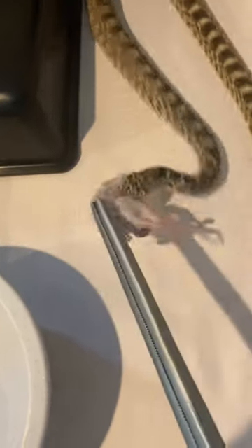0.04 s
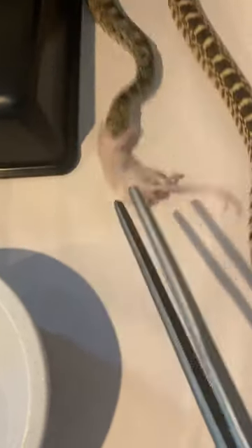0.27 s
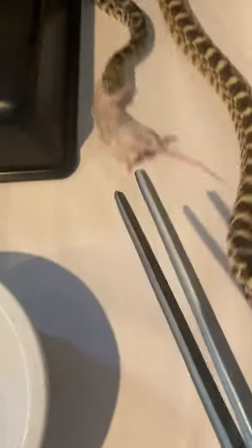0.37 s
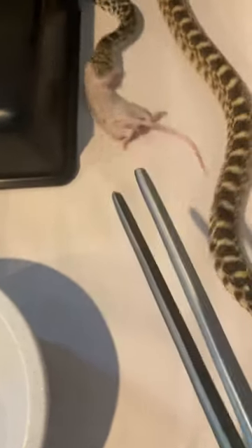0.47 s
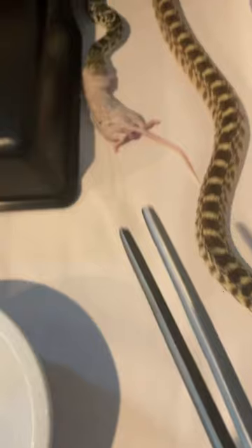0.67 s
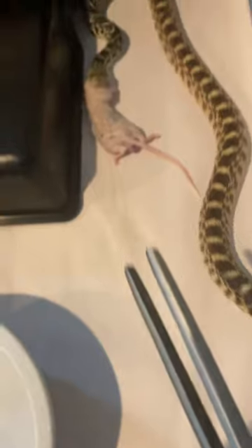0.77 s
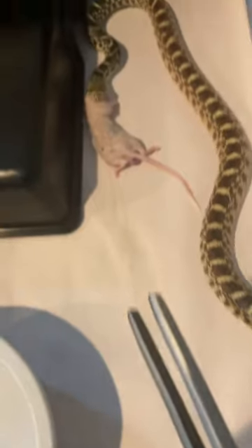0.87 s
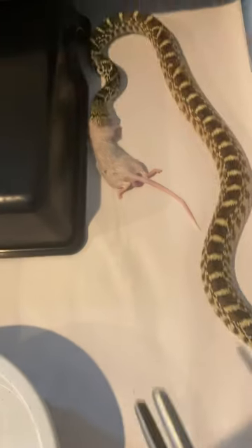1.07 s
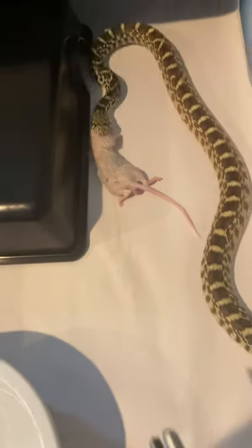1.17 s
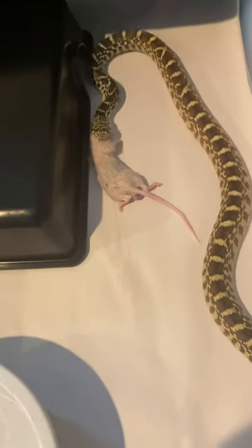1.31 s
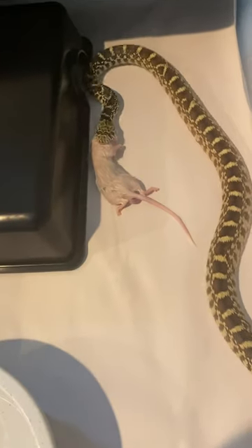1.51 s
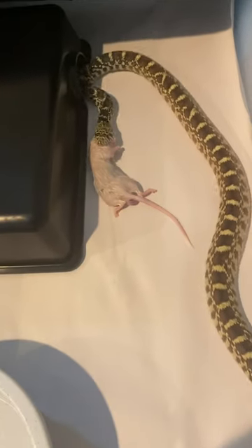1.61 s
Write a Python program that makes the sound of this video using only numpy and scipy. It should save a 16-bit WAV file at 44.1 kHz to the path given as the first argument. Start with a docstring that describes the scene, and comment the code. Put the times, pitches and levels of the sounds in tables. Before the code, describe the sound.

A snake's strike makes one hollow thump in a paper-lined plastic tub, close by. First its body slides softly. At about 0.2 seconds the paper scuffs, jaws and steel tongs snap, and snake and prey land with the thump. Scales drag back with a soft, fading hiss, then scratch lightly on the paper from 0.9 to about 1.4 seconds. A low room hum lies underneath.

```python
"""A snake snatches a mouse from steel tongs in a paper-lined plastic tub, close to the microphone.
First its body slides softly over the paper, above a low room hum. At about 0.2 s it strikes:
the paper is scuffed, jaws and tongs snap, and snake and prey land, ringing the tub with a hollow thump.
Then it pulls back with a hiss of sliding scales, and from 0.9 s single scales scratch on the paper."""
import sys
import numpy as np
from scipy import signal
from scipy.fft import rfft, irfft
from scipy.io import wavfile

SR = 44100
rng = np.random.default_rng(int(sys.argv[2]) if len(sys.argv) > 2 else 0)


def master_out(mix):
    """Clip the mix to full scale and print it as 16-bit PCM to the path in sys.argv[1]."""
    frames = np.transpose(np.atleast_2d(mix))
    ceiling = np.clip(frames, -1, 1)
    pcm = np.round(ceiling * 32767).astype(np.int16)
    wavfile.write(sys.argv[1], SR, pcm)


N = 72765
T = np.arange(N) / SR
HZ = np.fft.rfftfreq(N, 1 / SR)


def thump():
    """The landing body slaps the paper and rings the tub floor, which gives off little deep bass."""
    # blows on the floor: t/s, level/dB, contact time/s
    blows = [(0.2147, -26.5, 0.00065), (0.2199, -16.5, 0.00453), (0.2293, -20, 0.00188),
             (0.2331, -28.5, 0.0018)]
    # tones of the floor: f/Hz, level/dB, time to fade by 60 dB/s
    floor_tones = [(85.8, -3.5, 0.11), (183, 7, 0.0498), (287.5, -2.5, 0.054), (425, -7, .07),
                   (489.4, -13, 0.077), (686, -24.5, 0.057), (881, -15, 0.047), (1089, -5, 0.033),
                   (1330, -12, 0.035), (2300, -21, .022)]
    # paper shoved and slapped: middle t/s, length/s, level/dB
    slaps = [(0.195, 0.013, -52.5), (0.2141, 0.0096, -36.5)]
    # tone colour of the paper: f/Hz, level/dB
    slap_colour = [(60, -12), (420, 7.5), (700, 0.5), (1200, -14), (2000, -6), (5000, -15), (9000, -23),
                   (16000, -17)]
    force = np.zeros(N)
    for start, db, contact in blows:
        push = np.sin(np.pi * np.clip((T - start) / contact, 0, 1)) ** 2
        force -= amp(db) * push / push.sum()
    floor = signal.fftconvolve(force, ring(floor_tones, T))[:N]
    low_cut = signal.butter(2, 75, "high", fs=SR, output="sos")
    paper = sum(swell(*slap) for slap in slaps) * friction(slap_colour)
    return signal.sosfilt(low_cut, floor) + paper


def bite():
    """Jaws and tongs snap and ring briefly as the prey is torn away."""
    # snaps: t/s, level/dB
    snaps = [(0.2061, -30), (0.2585, -36.5)]
    # tones of a snap: f/Hz, level/dB, time to fade by 60 dB/s
    snap_tones = [(3450, -2, 0.0094), (4540, 1.5, 0.0063), (5140, 3, 0.0086), (6700, -26, 0.0067),
                  (8240, -1, 0.0085), (12000, -33, .002)]
    return sum(amp(db) * ring(snap_tones, T - start) for start, db in snaps)


def sliding_scales():
    """The body drags over the paper in pulls, with uneven grip, and scuffs it in the strike."""
    # steady drag: t/s, level/dB
    drag_levels = [(0, -60.5), (0.13, -63), (0.2, -56.5), (0.3, -52), (0.35, -55), (0.42, -57.5),
                   (0.48, -66), (0.53, -63), (0.66, -70), (0.82, -65), (0.9, -75.5), (0.96, -78.5),
                   (1.08, -66), (1.2, -68.5), (1.26, -87), (1.65, -81)]
    # pulls that swell the drag: middle t/s, length/s, level/dB
    pulls = [(0.018, .008, -55.5), (0.058, 0.032, -67.5), (0.438, 0.03, -54), (0.576, 0.024, -56),
             (0.631, 0.025, -58), (0.691, 0.021, -59), (0.765, 0.034, -60.5), (0.834, 0.023, -61.5),
             (1.001, 0.013, -55.5)]
    # fast scuffs: middle t/s, length/s, level/dB
    scuffs = [(0.1757, 0.0032, -34.5), (0.181, 0.025, -42.5), (0.2037, 0.003, -31), (0.253, 0.021, -45),
              (0.289, 0.013, -51.5)]
    # tone colours of drag and scuff: f/Hz, level/dB
    drag_colour = [(200, 4), (1200, -10.5), (2200, -8), (3300, -5.5), (4300, -1), (5100, 3), (6000, 2),
                   (7200, -2.5), (9000, -3.5), (12000, -6.5), (16000, -8.5)]
    scuff_colour = [(200, -24), (1200, -26.5), (2200, -12.5), (3300, -8.5), (4300, -2.5), (5100, 2),
                    (6000, -4), (7200, -1.5), (9000, -15.5), (12000, -21), (16000, -19)]
    steady = amp(np.interp(T, *np.transpose(drag_levels)))
    grip = amp(1.5 * waver(hz=87))
    drag = np.sqrt(steady ** 2 + sum(swell(*pull) ** 2 for pull in pulls)) * grip
    scuffing = np.sqrt(sum(swell(*scuff) ** 2 for scuff in scuffs))
    return drag * friction(drag_colour) + scuffing * friction(scuff_colour)


def scratches():
    """Belly scales catch on the paper one after another, each with its own tone colour."""
    # catches: t/s, relative level/dB
    catches = [(0.9316, -44), (0.9764, -45.5), (1.0132, -45), (1.0386, -41.5), (1.0506, -43.5),
               (1.062, -53), (1.072, -41.5), (1.0844, -46.5), (1.0965, -49), (1.111, -49.5), (1.1099, -50),
               (1.1325, -47), (1.1523, -43), (1.1737, -45), (1.1964, -49), (1.217, -44), (1.2715, -51.5),
               (1.3488, -50.5)]
    # tone colour they share: f/Hz, level/dB
    colour = [(200, -42), (1500, -27), (2100, -4), (2600, -24), (3150, -2.5), (4300, -11), (5300, 3.5),
              (6200, -1), (7200, 4.5), (9000, -4), (12000, -10), (16000, -8)]
    # bands that each catch makes louder or softer at random: f/Hz
    centres = [2000, 3100, 4200, 5300, 6400, 8000, 12000]
    rise_s, fade_s, trim_db, vary_db = 0.0029, 0.043, -5, 3.5
    bursts = np.array([amp(db + trim_db) * np.clip((T - start) / rise_s, 0, 1) * fade(T - start, fade_s)
                       for start, db in catches])
    weights = amp(vary_db * rng.standard_normal((len(catches), len(centres))))
    weights /= np.sqrt(np.mean(weights ** 2, axis=1, keepdims=True))
    rub = rfft(friction(colour))
    bands = np.array([irfft(rub * np.interp(HZ, centres, band), N) for band in np.eye(len(centres))])
    return (weights.T @ bursts * bands).sum(axis=0)


def friction(colour):
    """Rubbing is many tiny slips of uneven size over a smooth hiss."""
    slips_per_s, spread_db, slip_share = 4600, 3.5, 0.56
    size = amp(spread_db * np.minimum(rng.exponential(1, N), 4))
    slips = size * rng.choice([-1, 1], N) * (rng.random(N) < slips_per_s / SR)
    hiss = rng.standard_normal(N)
    return coloured(np.sqrt(slip_share) * unit(slips) + np.sqrt(1 - slip_share) * hiss, colour)


def room(x):
    """The room adds a soft wash of echoes whose treble dies first."""
    # echo length: f/Hz, time to fade by 60 dB/s
    fade_times = [(80, 0.43), (300, 0.7), (1000, 0.35), (5000, 0.37), (14000, .18)]
    hz, t, noise = signal.stft(rng.standard_normal(SR // 2), SR, nperseg=256)
    tail = signal.istft(noise * fade(t, look_up(fade_times, hz)[:, None]), SR, nperseg=256)[1]
    tail *= np.minimum(np.arange(len(tail)) / SR / 0.0029, 1)  # quick fade-in
    return signal.fftconvolve(x, tail / np.linalg.norm(tail))[:N]


def channels(x):
    """The left and right channels are out of step by a phase that grows with pitch, each with its own share of
    shifting wall echoes."""
    # how far left is ahead of right: f/Hz, phase/rad
    left_lead = [(20, 0), (1500, -.05), (2600, .6), (3600, .1), (4300, .5), (5000, .1), (5600, .8),
                 (6400, 2.2), (7050, 3.08), (7900, 3.2), (8700, 4.4), (9400, 5.2), (9900, 6.25),
                 (11100, 6.3), (11700, 7.), (12400, 8.6), (13100, 9.35), (14000, 9.5), (14800, 10.4),
                 (15400, 11.8), (16000, 12.3)]
    # echoes added on the left and subtracted on the right: f/Hz, level/dB
    echo_colour = [(30, -35), (150, -27), (350, -8.5), (700, 7), (1500, -4), (2700, 2.5), (4000, -4.5),
                   (5000, -11), (7000, -31), (16000, -44)]
    walls = rng.standard_normal(N) * fade(T, fade_s=0.021)
    echoes = signal.fftconvolve(x, walls / np.linalg.norm(walls))[:N] * waver(hz=39.3)
    shared = rfft(x)
    apart = rfft(echoes) * amp(look_up(echo_colour, HZ))
    lead = np.exp(1j * look_up(left_lead, HZ))
    return irfft(np.array([shared + apart, (shared - apart) / lead]), N)


def background():
    """The room hums and rumbles, and the microphones hiss faintly."""
    # tone colours of rumble and hiss: f/Hz, level/dB
    rumble_colour = [(15, -28), (30, -17), (45, -10.5), (58, -4.5), (80, -9), (125, -13.5), (160, -12),
                     (200, -5), (270, -18), (390, -19.5), (520, -29.5), (800, -42.5), (1500, -53),
                     (4000, -84), (16000, -109)]
    hiss_colour = [(500, 0.5), (1500, -7.5), (3000, -17.5), (4300, -6), (6000, -2), (8000, 1.5), (11000, 2),
                   (14000, 0), (16000, -1)]
    hum_hz, waver_hz = 57.07, 7
    loudness = amp(3.5 * waver(waver_hz))
    hum = loudness * np.sin(2 * np.pi * hum_hz * T + 0.77 * waver(waver_hz))
    rumble = coloured(rng.standard_normal(N), rumble_colour)
    hiss = coloured(rng.standard_normal(N), hiss_colour)
    return amp(-54.5) * unit(hum) + amp(-54) * rumble + amp(-68) * hiss


def amp(db):
    """Turns decibels into a number to multiply by."""
    return 10 ** (np.asarray(db) / 20)


def unit(x):
    """Scales x to an average strength (rms) of 1."""
    return x / np.sqrt(np.mean(x ** 2) + 1e-20)


def look_up(points, hz):
    """Reads between the rows of a table, with octaves evenly spaced."""
    f, value = np.transpose(points)
    return np.interp(np.log(hz + 1), np.log(f), value)


def coloured(x, colour):
    """Gives x a tone colour (a balance of low and high), at strength 1."""
    return unit(irfft(rfft(x) * amp(look_up(colour, HZ)), N))


def swell(middle, length, db):
    """A bell-shaped rise and fall."""
    return amp(db) * np.exp(-2 * ((T - middle) / length) ** 2)


def fade(t, fade_s):
    """Starts at t = 0 and falls by 60 dB every fade_s seconds."""
    return (t >= 0) * np.exp(-np.log(1000) * np.maximum(t, 0) / fade_s)


def ring(tones, t):
    """The fading tones of something struck at t = 0."""
    return sum(amp(db) * fade(t, fade_s) * np.sin(2 * np.pi * hz * t) for hz, db, fade_s in tones)


def waver(hz):
    """A random wobble up to about hz times a second, at strength 1."""
    return unit(irfft(rfft(rng.standard_normal(N)) * np.exp(-(HZ / hz) ** 2), N))


def scene():
    """Thump, rubbing and bite echo in the room, over the background."""
    low = thump()
    high = sliding_scales() + scratches() + bite()
    echoes = room(amp(-18) * low + amp(-14) * high)
    return channels(low + high + echoes + background())


def record(dry):
    """Cuts off the very highest treble."""
    cutoff_hz = 15850
    treble_cut = signal.firwin(511, cutoff_hz, window=("kaiser", 9), fs=SR)
    return signal.oaconvolve(dry, treble_cut[None], "same")


dry = scene()
out = record(dry)
master_out(out)
```